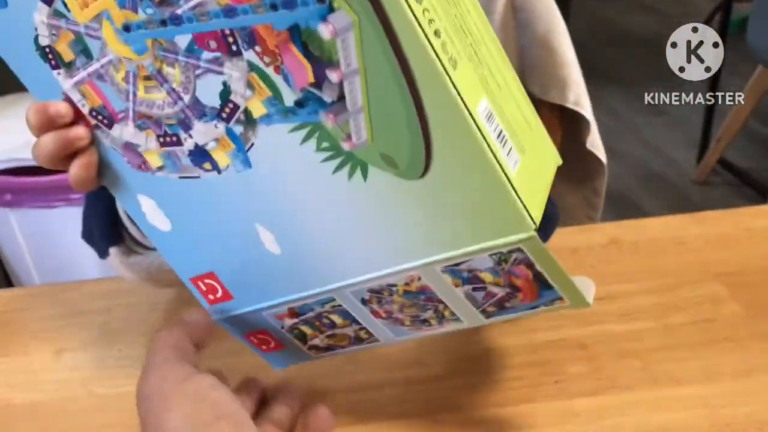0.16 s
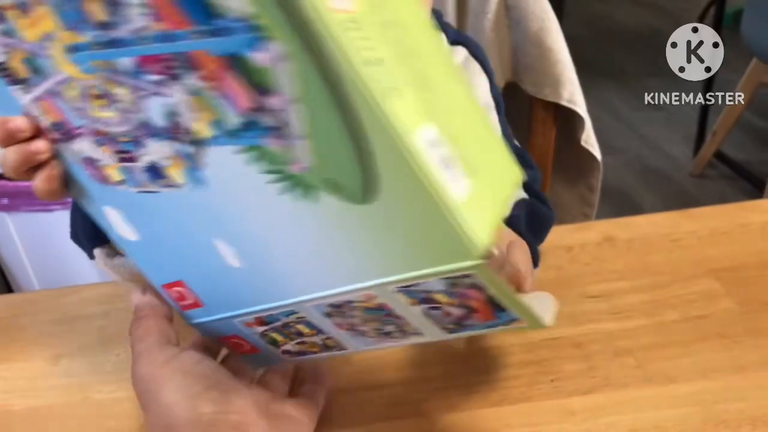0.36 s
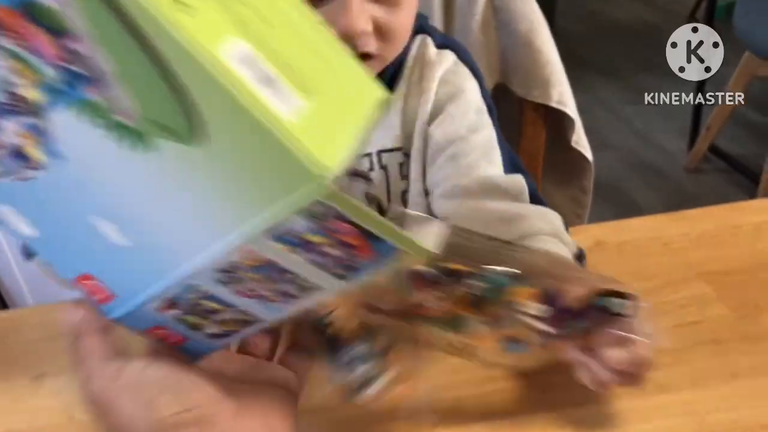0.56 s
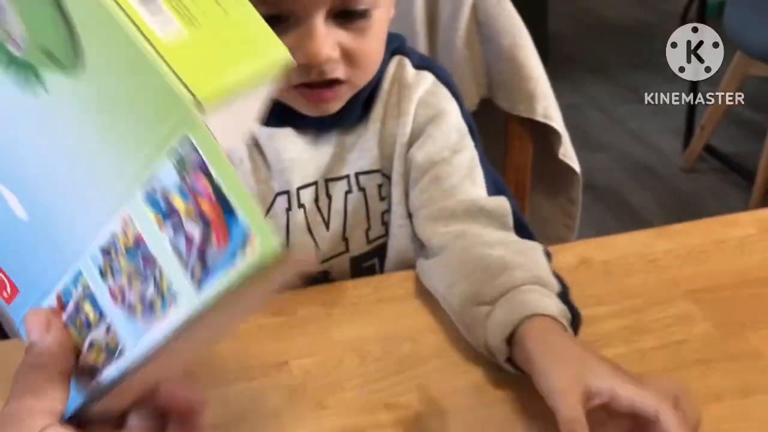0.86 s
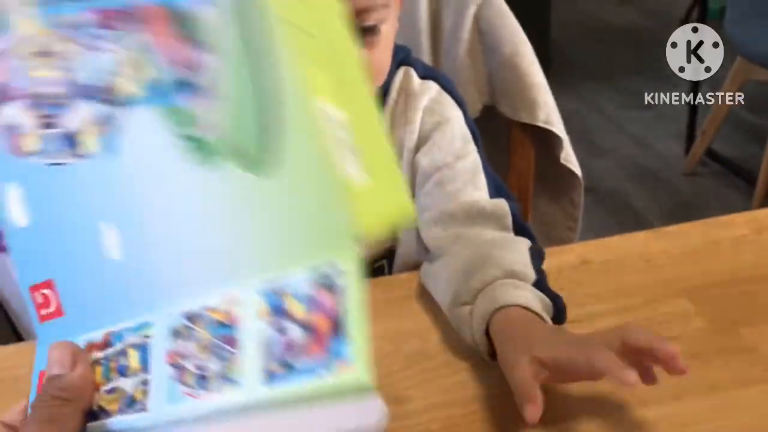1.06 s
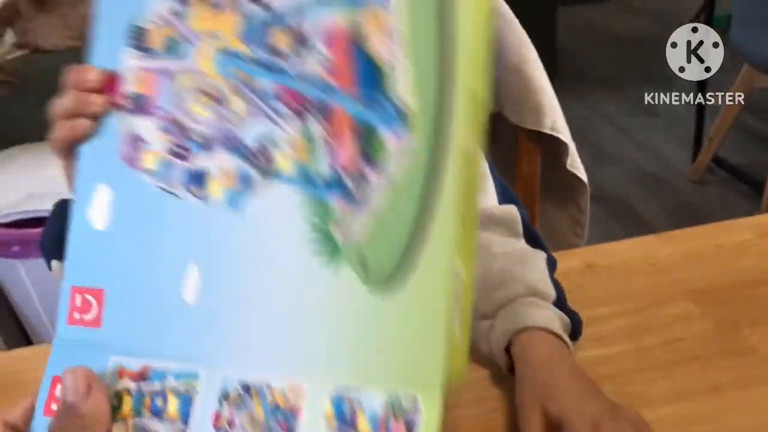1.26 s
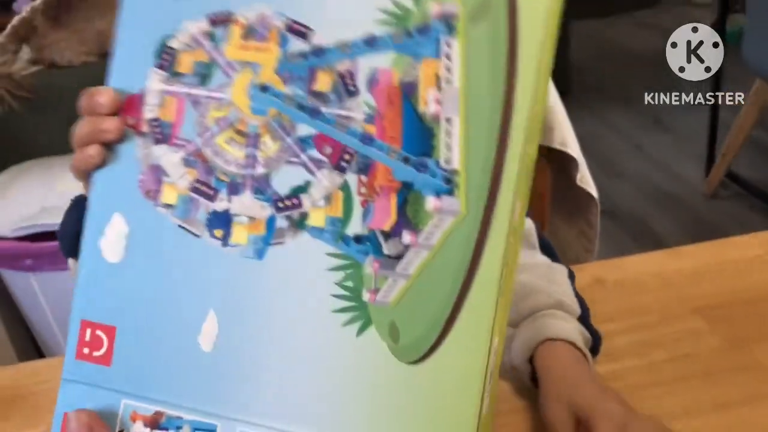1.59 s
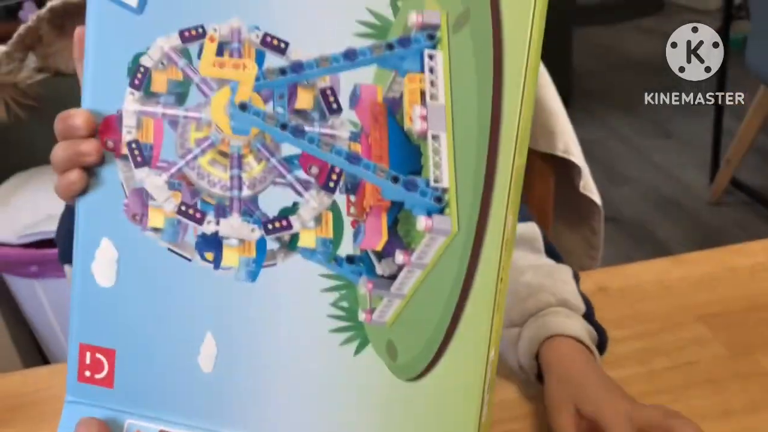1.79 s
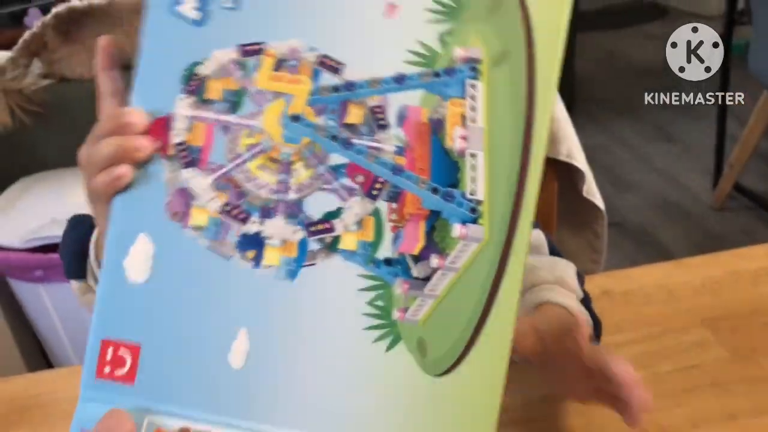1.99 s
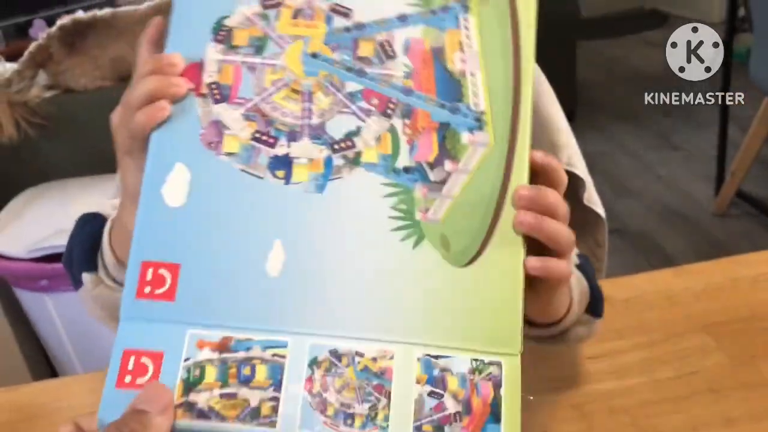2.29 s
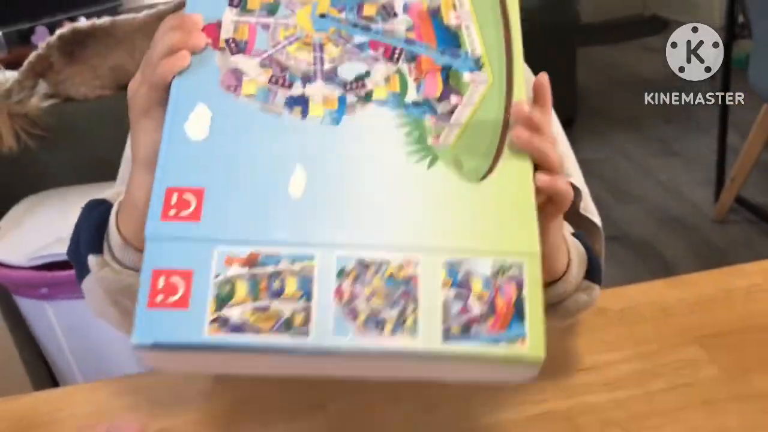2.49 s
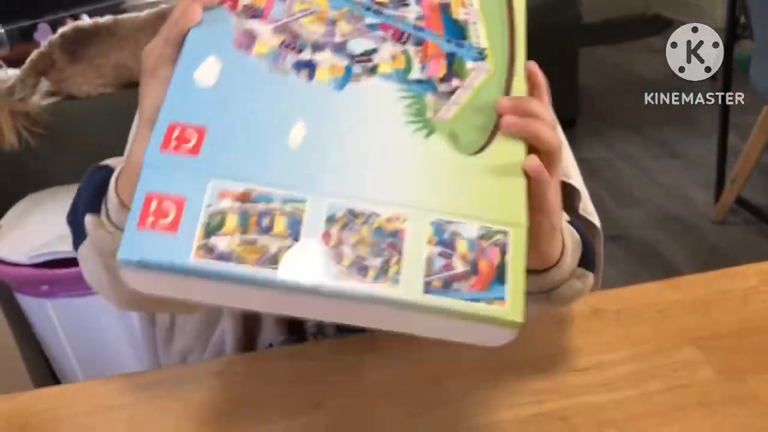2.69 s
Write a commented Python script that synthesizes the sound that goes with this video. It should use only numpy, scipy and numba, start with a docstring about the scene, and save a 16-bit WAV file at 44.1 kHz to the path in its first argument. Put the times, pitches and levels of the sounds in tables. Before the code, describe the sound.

Plastic bags of small toy pieces crackle and rattle in a cardboard box, close up in a small room. After a quiet start, sharp snaps begin around 0.2 s and build to the loudest, rattling burst with box knocks near 0.8-1.0 s. Softer rustling follows, with a hollow bump at 1.5 s, thumping slumps around 2.15-2.25 s and a last crunchy shift at 2.55 s, fading into faint hum.

```python
"""Bags of toy pieces shaken from a box

Plastic bags of small pieces slide out of a cardboard box shaken over a wooden table, close to a phone.
Film: noise-burst snaps, and a rustle of dense ticks over hiss; slumping heaps swell rustle and rumble.
Box: low random thuds, and knocks that ring decaying modes. A short noise tail is the small room;
filtered noise and two wavering sines are the room tone and hum. The level sinks at the end."""
import sys
import numpy as np
from scipy import signal
from scipy.fft import rfft, irfft
from scipy.io import wavfile
from scipy.ndimage import uniform_filter1d
from numba import njit

SR = 44100
rng = np.random.default_rng(int(sys.argv[2]) if len(sys.argv) > 2 else 0)


def undo_db(level):
    """Turn decibels back into plain size, where 20 dB means ten times bigger."""
    steps = np.asarray(level, float) / 20
    return 10 ** steps


def dump(signal):
    """Clip the signal to [-1, 1] and save it as 16-bit WAV at the path in sys.argv[1]."""
    limited = np.clip(np.atleast_2d(signal).T, -1, 1)
    pcm = np.round(limited * 32767).astype(np.int16)
    wavfile.write(sys.argv[1], SR, pcm)


N = 125685

# room tone spectrum: f/Hz, relative density/dB
AIR_SPECTRUM = [(18, -49), (50, -22), (82, -7), (137, -6), (420, -22), (639, -17), (15500, -49)]
# wavering hum: f/Hz, width of wander/Hz, level/dB
HUM_LINES = [(58, 5.4, -55), (123.6, 6.54, -55.5)]
# box rumble spectrum: f/Hz, relative density/dB
RUMBLE_SPECTRUM = [(40, -6), (90, -10), (300, -0.5), (500, -5.5), (650, 1), (1200, -8), (3000, -70)]
# modes of the box: f/Hz, t60/s
BOX_MODES = [(58, 0.2), (115, 0.031), (250, 0.048), (385, 0.077), (625, 0.082), (880, 0.053), (1071, 0.052),
             (1400, 0.11), (1700, 0.028)]
# knocks on the box: t/s, level/dB, centre of the blow f/Hz
BOX_KNOCKS = [(0.496, -23, 492), (.556, -26, 293), (.780, -18, 870), (0.786, -22.5, 249), (0.8, -30, 58.3),
              (1.002, -34.5, 58), (1.498, -19, 620), (1.499, -20.5, 1080), (2.138, -22, 92),
              (2.141, -26.5, 327), (2.254, -23, 1000), (2.258, -18, 90), (2.268, -29, 400)]
# handling of bags and box: t/s, rustle level/dB, box rumble level/dB
HANDLING_LEVELS = [(0, -53.5, -52.5), (.2, -48.5, -49), (.29, -49, -47), (.32, -40, -41),
                   (.5, -29.5, -39.5), (.72, -30.5, -41.5), (0.971, -36.5, -44), (1.07, -41.5, -51),
                   (1.11, -50, -58.5), (1.239, -45, -46.5), (1.27, -39, -49), (1.45, -38, -42),
                   (1.62, -34.5, -43.5), (1.78, -48.5, -44.5), (1.93, -35.5, -45.5), (2.1, -40, -41.5),
                   (2.42, -35, -41), (2.51, -41, -46), (2.85, -55, -51.5)]
# heaps of pieces slumping in a bag: t of peak/s, rise/ms, level/dB, t60/ms
HEAP_SLUMPS = [(0.234, 4.6, -24.5, 90), (0.369, 1.5, -24, 165), (0.782, 7.4, -14.5, 70),
               (0.807, 5.7, -21, 170), (0.898, 34, -22.5, 110), (0.951, 7.7, -25.5, 93),
               (.996, 6, -27.5, 190), (1.169, 2.7, -32.5, 32), (1.401, 6.5, -33.5, 600),
               (1.496, 6.1, -24, 300), (1.658, 12, -25.5, 310), (1.724, 91, -24.5, 290),
               (2.141, 15, -27.5, 110), (2.239, 12, -17.5, 54), (2.255, 2.7, -16, 210),
               (2.546, 21, -16.5, 140), (2.55, 6.4, -23, 310)]
# film rustle spectrum: f/Hz, relative density/dB
RUSTLE_SPECTRUM = [(400, -40), (800, -3), (2000, -3), (3500, -0.5), (4900, -4.5), (6400, -0.5), (7500, -8),
                   (9200, -4.5), (10300, -10), (12500, -5), (15500, -9.5)]
# single snaps of film and pieces: t/s, level/dB, ring f/Hz, treble/dB before normalising, t60/ms
FILM_SNAPS = [(0.218, -15.5, 6360, -5, 4.4), (0.2413, -3, 8300, 34, 7), (0.3008, -12, 3870, 5.5, 11.5),
              (0.3342, -10, 6140, -11, 6.6), (0.3698, -8, 2000, -3.5, 9.3), (0.4163, -15, 1540, -4, 7.8),
              (0.4369, -6, 3720, -6, 2.7), (0.492, -13.5, 9200, -14, 11), (0.5206, -6, 5260, -10, 6.5),
              (0.5368, -5, 4300, -25, 5.4), (0.5904, -9, 3420, -1.5, 20), (0.6634, -13, 1360, -1, 20),
              (0.703, -9, 5930, 0, 7.5), (0.74, -6.5, 9280, 1, 21), (0.7686, -3, 2460, 0, 9.4),
              (0.7792, 1, 2370, -1, 9), (0.7899, 1.5, 4060, -10, 2.5), (0.8062, -5, 6260, 3, 12),
              (0.8143, -13, 2900, -5, 6), (0.833, -13, 2420, -20, 21), (0.8499, -9, 4550, -1, 14),
              (0.8804, 3.5, 4400, 0.5, 3.3), (0.9048, -5, 1280, 8.5, 7.3), (0.984, -2, 3230, -7, 5.6),
              (0.9879, -4.5, 4030, -1, 9.9), (0.9929, 1, 3970, -1.5, 13.2), (1.0774, -12.5, 3770, -4, 9.8),
              (1.1529, -25, 4030, 5, 11), (1.2466, -14.5, 5600, -1.5, 19), (1.3107, -11, 4570, -3.5, 13),
              (1.342, -20.5, 3630, -9, 15), (1.3846, -13.5, 3400, -4, 5.4), (1.397, -15, 5640, 1, 15),
              (1.427, -5.5, 6500, 7, 6.6), (1.5555, -15, 3550, -2, 14), (1.569, -17.5, 3130, -6, 19),
              (1.582, -19, 4700, -4, 17), (1.7017, -15.5, 2620, -15, 12), (1.7443, -19, 6740, -10, 8),
              (1.7628, -15.5, 2980, -1, 15), (1.796, -15.5, 4990, 0, 26), (1.8752, -22.5, 3140, -8, 35),
              (1.907, -16, 5160, -8, 19), (1.9224, -11.5, 3820, -6, 11), (1.935, -14.5, 5850, -3, 14),
              (1.96, -17.5, 5300, -5, 15), (2.0088, -16, 3050, -3.5, 8.7), (2.0656, -17.5, 5000, -5, 24),
              (2.109, -21, 5900, 0, 11), (2.188, -16.5, 2310, 3, 30), (2.1987, -6, 8700, 1, 10.5),
              (2.4375, -12, 3900, -4, 24.6), (2.529, -7.5, 3240, 1, 7), (2.5425, -6, 3380, 0, 13),
              (2.5509, -4, 3210, -8, 39)]

AIR_DB = -53.5
ROOM_T60_S, ROOM_TREBLE_T60_S, ROOM_DB = 0.41, 0.35, -12
FADE_START_S, FADE_END_DB = 2.786, -9
SLUMP_IN_BOX_DB = -12.5  # heaps in the box rumble re the rustle
BLOW_WIDTH_OCTAVES, PUSH_CYCLES = 0.31, 0.28
LANDING_CYCLES, DETUNE_RATIO = 3.45, 0.015
TICKS_PER_S, TICK_T60_CYCLES, HISS_DB = 1800, 14, 1  # hiss re ticks
PATCHES_PER_S, PATCHY_DB = 35, 2
DULL_DB_PER_DB_OCTAVE = 0.1053  # quieter rustle is duller
CREASES_PER_S, CREASE_MAX_DB, CREASE_DECAY_MS = 45, 8, 2
SNAP_Q, SNAP_BODY_DB, SNAP_RISE_PER_T60 = 6.6, -4, 0.097


def level(x, db):
    """Scale to an rms level."""
    return x * undo_db(db) / np.sqrt(np.mean(x ** 2))


def colour(x, table):
    """Filter by (Hz, dB) points, interpolated over log frequency."""
    hz, db = np.array(table, float).T
    f = np.arange(N // 2 + 1) * SR / N + 1
    return irfft(rfft(x) * undo_db(np.interp(np.log(f), np.log(hz), db)), N)


def band(x, lo_hz, hi_hz):
    """Causal band-pass."""
    sos = signal.butter(2, [lo_hz, min(hi_hz, SR / 2.1)], "band", fs=SR, output="sos")
    return signal.sosfilt(sos, x)


@njit
def rings(start, hz, t60_s, size, phase):
    """Sum of decaying sines, each cut off after its t60."""
    y = np.zeros(N)
    for k in range(len(hz)):
        step = np.exp(2j * np.pi * hz[k] / SR - np.log(1000) / (t60_s[k] * SR))
        z = size[k] * np.exp(1j * phase[k])
        for i in range(start[k], min(N, start[k] + int(t60_s[k] * SR))):
            y[i] += z.imag
            z *= step
    return y


def walk(rate_hz):
    """Normal random values held 1 / rate_hz s, slewed by a running mean of that length."""
    hold = int(SR / rate_hz)
    return uniform_filter1d(np.repeat(rng.standard_normal(N // 200 + 1), hold)[:N], hold)


def air():
    """Room tone is filtered noise; each hum line is a sine wandering in pitch and level."""
    hum = 0
    for hz, width_hz, db in HUM_LINES:
        swell = undo_db(2 * walk(10.13))
        pitch_hz = hz + width_hz / 2 * walk(14)
        hum = hum + level(swell * np.sin(2 * np.pi * np.cumsum(pitch_hz) / SR), db)
    return level(colour(rng.standard_normal(N), AIR_SPECTRUM), AIR_DB) + hum


def room(x):
    """Add a diffuse noise tail that loses its treble first."""
    t = np.arange(int(0.6 * SR)) / SR
    noise = rng.standard_normal(len(t)) * np.minimum(t / 0.0086, 1)
    low = band(noise, 60, 3000)
    tail = low * undo_db(-60 * t / ROOM_T60_S) + (noise - low) * undo_db(-60 * t / ROOM_TREBLE_T60_S)
    tail *= undo_db(ROOM_DB) / np.sqrt(np.sum(tail ** 2))
    return x + signal.fftconvolve(x, tail)[:N]


def box_rumble(power):
    """Random small thuds, filtered to the box and following a power envelope."""
    hits = rng.random(N) < 1500 / SR  # 1500 per second
    thuds = hits * undo_db(3.2 * rng.random(N)) * rng.standard_normal(N)
    return level(colour(thuds, RUMBLE_SPECTRUM), 0) * np.sqrt(power)


def knocks():
    """A bag lands in four contacts on the modes near the blow's centre; lower is softer and more spread."""
    out, (hz, t60_s) = 0, np.array(BOX_MODES).T
    for s, db, centre_hz in BOX_KNOCKS:
        octaves_off = np.log2(hz / centre_hz)
        size = undo_db(db) * np.exp(-0.5 * (octaves_off / BLOW_WIDTH_OCTAVES) ** 2)
        push = np.hanning(int(PUSH_CYCLES * SR / centre_hz) + 3)
        late = np.append(0, rng.random(3))  # share of the landing time
        delay = np.repeat(late * LANDING_CYCLES * SR / centre_hz, len(hz)).astype(np.int64)
        start = int(s * SR) - len(push) // 2 + delay
        # the box flexes between contacts
        bent_hz = hz * (1 + DETUNE_RATIO * rng.standard_normal((len(late), len(hz))))
        bounce_db = np.where(late > 0, -7.5 - 5 * late, 0)
        sizes = size * undo_db(bounce_db[:, None])
        phase = 2 * np.pi * rng.random(bent_hz.size)
        ring = rings(start, bent_hz.ravel(), np.tile(t60_s, len(late)), sizes.ravel(), phase)
        out = out + signal.oaconvolve(ring, push / push.sum())[:N]
    return out


def slumps(t):
    """Power envelope of the heaps: exponential rise, then exponential fall."""
    power = 0
    for s, rise_ms, db, t60_ms in HEAP_SLUMPS:
        rise = np.exp(2 * (t - s) / (rise_ms / 2000))  # amplitude grows by e squared in rise_ms
        fall = undo_db(-120 * (t - s) / (t60_ms / 1000))
        power = power + undo_db(2 * db) * np.where(t < s, rise, fall)
    return power


def snaps():
    """Each snap is a short burst: a ringing band, a treble crack and a little body."""
    out, t = np.zeros(N + 2048), np.arange(2048) / SR
    for s, db, hz, treble_db, t60_ms in FILM_SNAPS:
        t60_s = t60_ms / 1000
        env = np.minimum(t / (SNAP_RISE_PER_T60 * t60_s), 1) * undo_db(-60 * t / t60_s)

        def unit(v):
            """Scale to unit rms under the envelope."""
            return v / np.sqrt(np.sum((v * env) ** 2) / np.sum(env ** 2))

        a, b, c = rng.standard_normal((3, len(t)))
        tone = np.sin(2 * np.pi * hz * t) * env
        ring = tone + 0.62 * unit(band(a, hz * (1 - 1 / SNAP_Q), hz * (1 + 1 / SNAP_Q)))
        crack = undo_db(treble_db) * unit(band(b, 5500, 18000))
        body = undo_db(SNAP_BODY_DB) * unit(band(c, 0.35 * hz, 1.27 * hz + 1500))
        start = int(s * SR)
        out[start:start + len(t)] += undo_db(db) * env * unit(ring + crack + body)
    return out[:N]


def creases():
    """Gain of small creases that flare for a few ms at random moments."""
    u = rng.random((N, 2))
    kicks = (u[:, 0] < CREASES_PER_S / SR) * undo_db(2 * CREASE_MAX_DB) * u[:, 1] ** 2
    decay = np.exp(-1000 / (CREASE_DECAY_MS * SR))
    flares = signal.lfilter([1], [1, -decay], uniform_filter1d(kicks, size=24))
    return np.sqrt(1 + flares)


def rustle(power):
    """Film: dense ticks of a few cycles over hiss; each octave comes and goes in patches."""
    u = rng.random((int(TICKS_PER_S * N / SR), 4))
    start = (u[:, 0] * N).astype(np.int64)
    hz = 700 * 22 ** u[:, 1]
    size = undo_db(-3.2 * np.log(u[:, 2] + 0.009)) * hz  # few large ticks, many small
    ticks = rings(start, hz, TICK_T60_CYCLES / hz, size, 2 * np.pi * u[:, 3])
    grain = level(ticks, 0) + undo_db(HISS_DB) * rng.standard_normal(N)
    spectrum = rfft(level(colour(grain, RUSTLE_SPECTRUM) * creases(), 0))

    octave = np.log2(np.clip(np.arange(N // 2 + 1) * SR / N, 1000, 16000) / 1000)  # re 1 kHz
    loudness_db = 10 * np.log10(power) + 30  # re -30 dB
    shared = walk(PATCHES_PER_S)
    out = 0
    for k in range(5):
        part = irfft(spectrum * np.clip(1 - abs(octave - k), 0, 1), N) * creases()
        patch_db = PATCHY_DB * (shared + walk(PATCHES_PER_S))
        tilt_db = DULL_DB_PER_DB_OCTAVE * (k - 2) * loudness_db  # pivots at 4 kHz
        out = out + part * undo_db(patch_db + tilt_db)
    return np.sqrt(power) * out


def scene():
    """All sources in the room, over the room tone, with the closing fade."""
    t = np.arange(N) / SR
    s, rustle_db, rumble_db = np.array(HANDLING_LEVELS, float).T
    heaps = slumps(t)
    film = rustle(undo_db(2 * np.interp(t, s, rustle_db)) + heaps)
    box = box_rumble(undo_db(2 * np.interp(t, s, rumble_db)) + heaps * undo_db(2 * SLUMP_IN_BOX_DB))
    mix = room(snaps() + film + box + knocks()) + air()
    fade_db = np.interp(t, [FADE_START_S, N / SR], [0, FADE_END_DB])
    return (mix * undo_db(fade_db))[None]


def roll_off(x):
    """The treble ends steeply here."""
    return signal.sosfilt(signal.butter(12, 16970, fs=SR, output="sos"), x)


def record(dry):
    """The phone cuts the deepest bass and the top, and clips at full scale."""
    bass_cut = signal.butter(4, 45, "high", fs=SR, output="sos")
    top_cut = signal.ellip(7, 0.5, 38, 15750, fs=SR, output="sos")
    heard = signal.sosfilt(np.vstack([bass_cut, top_cut]), dry)
    return roll_off(np.clip(heard, -1, 1))


dry = scene()
out = record(dry)
dump(out)
```